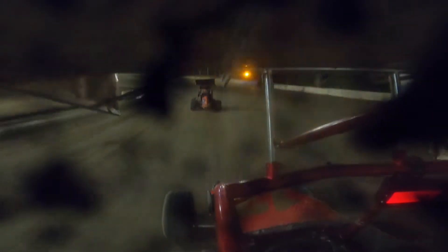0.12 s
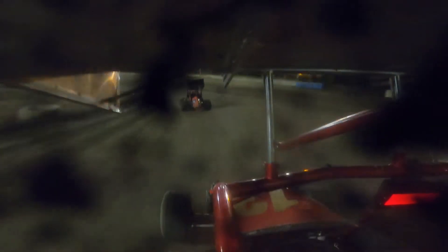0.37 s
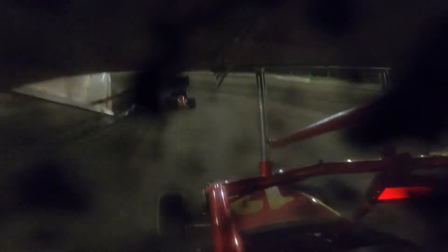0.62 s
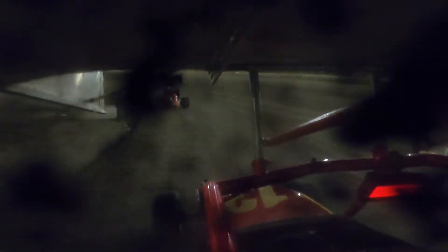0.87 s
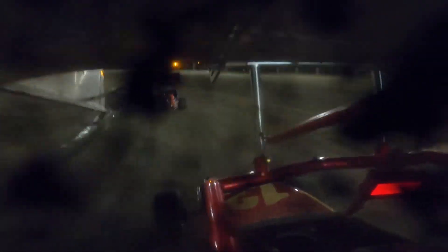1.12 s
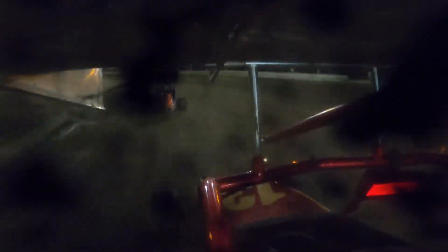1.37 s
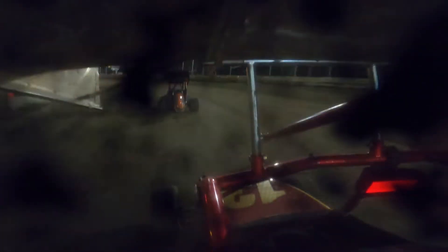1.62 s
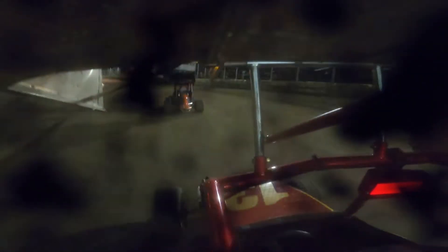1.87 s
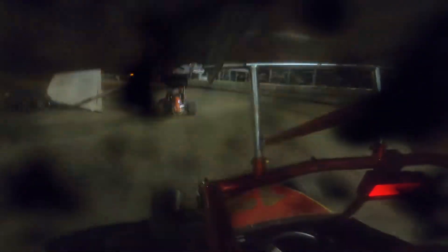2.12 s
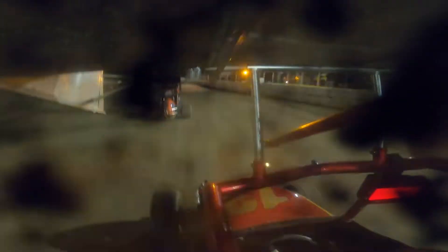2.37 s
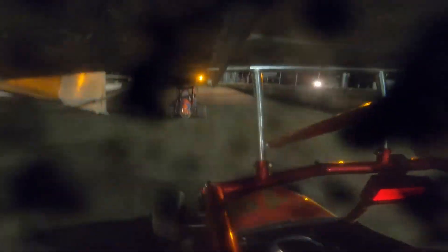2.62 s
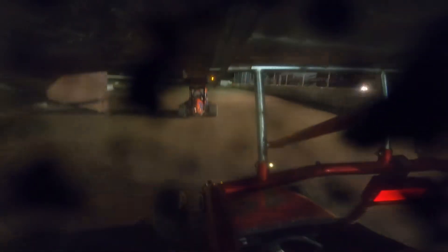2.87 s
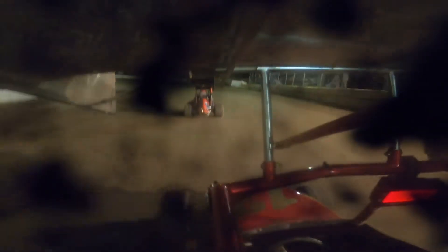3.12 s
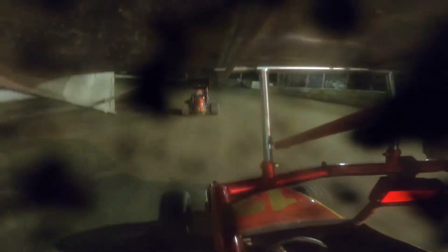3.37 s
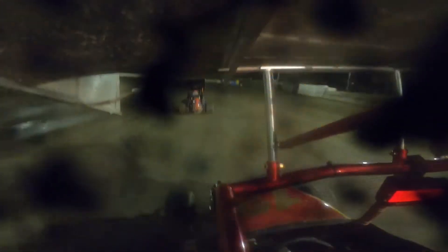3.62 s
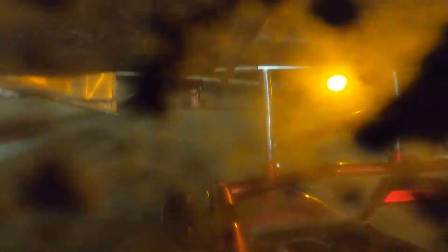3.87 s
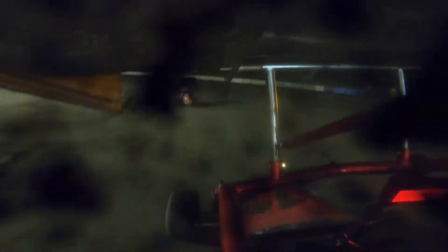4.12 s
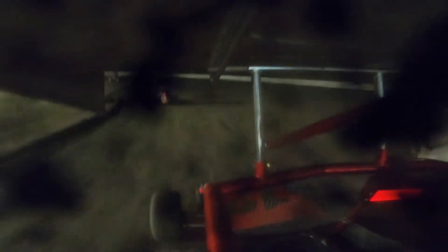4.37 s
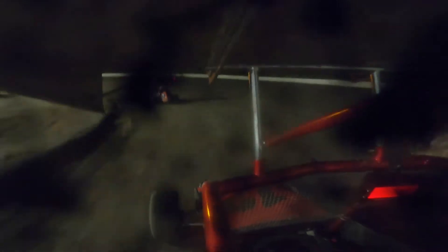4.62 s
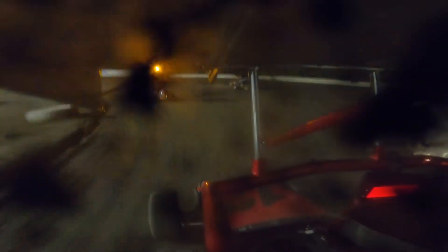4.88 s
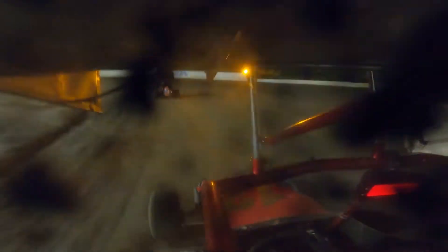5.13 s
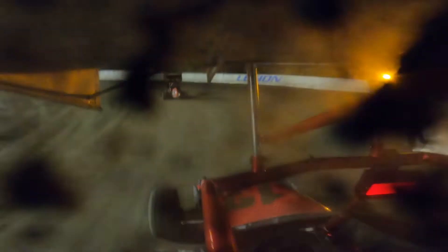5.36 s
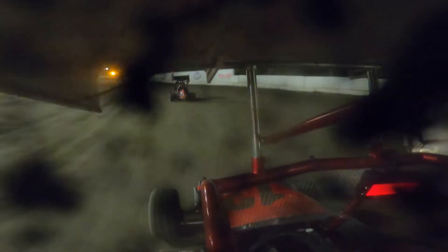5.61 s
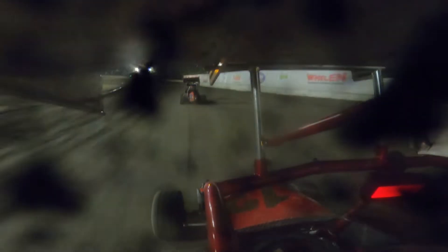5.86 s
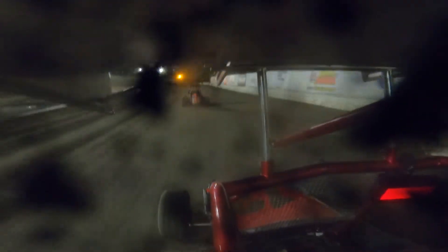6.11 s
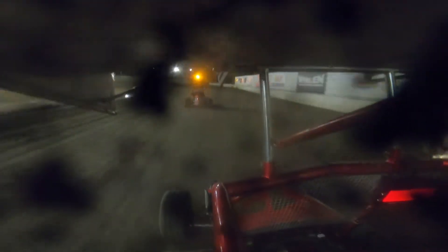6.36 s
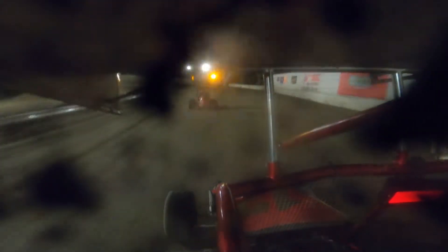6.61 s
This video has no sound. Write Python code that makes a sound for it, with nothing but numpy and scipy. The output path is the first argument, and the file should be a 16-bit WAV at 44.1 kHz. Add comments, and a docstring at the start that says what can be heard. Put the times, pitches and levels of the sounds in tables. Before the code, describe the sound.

A small racing engine drones loudly at high revs, muffled inside a sealed case, with frame buzz, track rumble and ticking grit.

```python
"""Racing engine from inside a sealed case

A small racing engine at high revs, heard by a microphone in a sealed camera case bolted to the roll cage.
The crank's shake comes through the frame as three low orders, whose beat stumbles now and then.
Frame buzz and track rumble are fluttering noise through resonances; flying grit is short noise scratches.
The case colours the grit and buzz, and shuts out the treble."""
import sys
import numpy as np
from scipy import signal
from scipy.fft import rfft, irfft, next_fast_len
from scipy.io import wavfile

SR = 44100
rng = np.random.default_rng(int(sys.argv[2]) if len(sys.argv) > 2 else 0)


def transcribe(u):
    """Save the signal u as a 16-bit wav file named by the first command-line argument.

    u: samples, shape (n,) or (channels, n), limited to [-1, 1]; the rate is SR.
    q: integer samples, one column per channel.
    """
    v = np.clip(np.atleast_2d(u).T, -1, 1)
    q = np.round(v * 32767).astype(np.int16)
    wavfile.write(sys.argv[1], SR, q)


def amp(db):
    return 10 ** (np.asarray(db, float) / 20)


N = 297218


def curves(rows):
    """Columns of a table whose first column is seconds, joined by straight lines in time."""
    s, *columns = np.transpose(rows)
    return [np.interp(np.arange(N) / SR, s, c) for c in columns]


def unit(x):
    """Scaled to rms 1."""
    return x / np.sqrt(np.mean(x ** 2) + 1e-20)


def drift(corner_hz):
    """Slow random wander of rms 1: white noise through two equal one-pole low-passes."""
    r = np.exp(-2 * np.pi * corner_hz / SR)
    noise = rng.standard_normal(N + SR)
    settled = signal.lfilter([1], [1, -2 * r, r * r], noise)[SR:]
    return unit(settled)


def shaking(flutter_db):
    """Broad vibration of rms 1: white noise whose strength flutters."""
    return unit(rng.standard_normal(N) * amp(flutter_db))


def resonate(x, modes, skirt=2.147):
    """A causal filter whose power is the sum of steep-sided resonances; unit power for white input."""
    size = next_fast_len(N + SR)
    hz = np.fft.rfftfreq(size, 1 / SR)
    power = 0
    for mid_hz, width_hz, db in modes:
        power = power + amp(2 * db) / (1 + (2 * (hz - mid_hz) / width_hz) ** 2) ** skirt
    cepstrum = irfft(np.log(power / power.mean()) / 2, size)
    cepstrum[1:size // 2] *= 2          # folding gives the shortest ring that starts with the blow
    cepstrum[size // 2 + 1:] = 0
    response = np.exp(rfft(cepstrum))
    return irfft(rfft(x, size) * response, size)[:N]


def split(x, hz, kind):
    """Low, middle or high part of a sound, by a Butterworth filter."""
    return signal.sosfilt(signal.butter(4, hz, kind, fs=SR, output="sos"), x)


# The ground under the wheels, which jolts the crank and shakes the frame.
# Each row: time in seconds, roughness from 0 to 1.
GROUND_ROUGHNESS = [(0, .4), (.45, .5), (.6, .9), (1.15, .9), (1.3, .35), (2.1, .15), (3.7, .15), (3.9, .4),
                    (5.45, .4), (5.55, 1), (5.68, 1), (5.75, .3), (6.25, .6), (6.45, .4), (6.74, .4)]


def roughness():
    """How rough the ground is at each moment."""
    return curves(GROUND_ROUGHNESS)[0]


# Moments when the beat stumbles and picks up out of step.
# Each row: middle in seconds, dip in dB of the first order, slip in crank turns.
BEAT_STUMBLES = [(.59, 12, .5), (.685, 7, -.4), (.755, 11, .4), (.932, 12, 0), (1.111, 13, 0),
                 (4.19, 11, -.15), (4.54, 5, .05), (5.336, 9, -.25), (5.537, 14, -.4), (5.565, 12, -.4),
                 (5.61, 8, -.4), (5.649, 11, 0), (5.932, 10, -.25), (6.163, 7, .3), (6.204, 7, -.4),
                 (6.381, 12, -.4), (6.628, 11, -.5), (6.687, 6, .3)]


def stumbles():
    """Bell-shaped dip in dB and smoothly stepped slip in radians of all stumbles."""
    half_width_s, stride = .009, 50   # stride: samples between computed points
    s, dip_db, turns = np.transpose(BEAT_STUMBLES)[:, :, None]
    away = (np.arange(0, N + stride, stride) / SR - s) / half_width_s
    dips = (dip_db * np.exp(-away ** 2)).sum(axis=0)
    slips = (np.pi * turns * (1 + np.tanh(2 * away))).sum(axis=0)
    return [np.interp(np.arange(N) / stride, np.arange(len(c)), c) for c in (dips, slips)]


# Speed of the engine, before wobble and slips.
# Each row: time in seconds, crank turns per second.
ENGINE_SPEED = [(0.0, 76.6), (0.8, 76.6), (0.98, 80), (1.2, 76), (1.4, 74.3), (1.75, 73.2), (2.15, 68.4),
                (2.3, 63.8), (2.45, 62.4), (2.9, 65.6), (3.05, 63.5), (3.3, 64.2), (3.5, 67.3),
                (3.75, 68.6), (3.97, 72), (4.38, 70.8), (4.55, 68.4), (4.95, 71), (5.3, 74.8), (5.57, 74.6),
                (5.72, 79.3), (6.12, 81.5), (6.35, 80.4), (6.74, 84.3)]


def crank_angle():
    """The crank turns unevenly, more so over rough ground, and slips at stumbles; angle in radians."""
    wobble = (.018 + .022 * roughness()) * drift(24)
    speed = curves(ENGINE_SPEED)[0] * (1 + wobble)
    slip = stumbles()[1]
    return 2 * np.pi * np.cumsum(speed) / SR + slip


# What the frame passes on from the crank orders to the case, by their pitch.
# Each row: pitch in Hz, rms level in dB before dips, wavering and gain control.
FRAME_MOUNT = [(62, -12), (72, -14), (84, -14.5), (124, -29), (132, -27.5), (148, -23), (168, -22.5),
               (188, -34), (208, -30), (224, -35.5), (250, -42)]


def engine(angle):
    """Three orders locked to the crank, as loud as the frame passes them, each wavering in its own way."""
    speed, rough = curves(ENGINE_SPEED)[0], roughness()
    first_db, second_db, third_db = (np.interp(k * speed, *np.transpose(FRAME_MOUNT)) for k in (1, 2, 3))
    dip_db = stumbles()[0]
    # rough ground dulls the first order and makes it waver
    first_db = first_db - dip_db - 1.0 * rough + .7 * rough * drift(30)
    second_db = second_db - .3 * dip_db + 2.0 * drift(14)
    third_db = third_db + 1.2 * drift(5)
    first = amp(first_db) * np.cos(angle)
    second = amp(second_db) * np.cos(2 * angle + 1.45 + .3 * drift(14))
    third = amp(third_db) * np.cos(3 * angle - 1.3 + 0.65 * drift(6.2))
    return np.sqrt(2) * (first + second + third)


# Lowest resonances of the frame.
# Each row: middle in Hz, width in Hz, relative level in dB.
RUMBLE_MODES = [(52.3, 43, 0), (95, 63, -3.5), (177.5, 77, -3)]


def rumble():
    """Track rumble: slowly fluttering noise through the lowest resonances, louder over rough ground."""
    level_db = -22.5 + 3 * roughness()
    flutter_db = 1.2 * drift(12) + 1.2 * drift(2.5)
    return resonate(shaking(flutter_db) * amp(level_db), RUMBLE_MODES)


# Panel resonances, above the rumble.
# Each row: middle in Hz, width in Hz, relative level in dB.
PANEL_MODES = [(310, 93, -1.5), (361.7, 154, 0.5), (482, 164, -7)]


def panel(jolts):
    """Panels hum: noise through their resonances, fluttering by itself and a little with the jolts."""
    level_db = -23.5 + 0.5 * roughness()
    flutter_db = 1.7 * drift(60) + 0.43 * jolts
    return resonate(shaking(flutter_db) * amp(level_db), PANEL_MODES)


# Resonances of the sealed case around the microphone, weak in the treble.
# Each row: middle in Hz, width in Hz, relative level in dB.
CASE_MODES = [(778, 250, -5.5), (1035, 238, -3), (1232.6, 268, 0.5), (1375, 39, -5.5), (1621, 160, -12.5),
              (1984, 465, -16.5), (2220, 100, -27.5), (2514, 180, -23.5), (2910, 366, -22),
              (3465, 810, -29), (4093, 365, -26.5), (5070, 300, -49.5), (5770, 780, -47.5),
              (7180, 650, -58.5), (9450, 1000, -70), (10300, 1100, -69), (12200, 2100, -71.5),
              (14000, 1500, -82)]
# Hollow drone of the case.
# Each row: time in seconds, level in dB before the low-pass split and gain control.
HOLLOW_LEVEL = [(0, -20), (.6, -20.5), (1.3, -21), (1.9, -23.5), (2.35, -26), (2.8, -19), (3.15, -25.5),
                (3.4, -22), (4.7, -20), (5.1, -22), (5.5, -20), (6.35, -21.5), (6.58, -16.5), (6.74, -24)]


def case(angle, jolts):
    """Drone, buzz and rattle of the case share its resonances and jolts; the rattle swells once a turn."""
    hollow_to_hz, rattle_from_hz = 880, 1547
    hollow_db = curves(HOLLOW_LEVEL)[0]
    buzz_db = -22.5
    rattle_db = -21.5 + 1 * roughness() - 1.4 * np.cos(angle - .1)
    hollow = resonate(shaking(0.83 * drift(46) + 1.6 * jolts) * amp(hollow_db), CASE_MODES)
    buzz = resonate(shaking(0.22 * drift(50) + 1.2 * jolts) * amp(buzz_db), CASE_MODES)
    rattle = resonate(shaking(0.97 * drift(60) + 1.6 * jolts) * amp(rattle_db), CASE_MODES)
    low = split(hollow, hollow_to_hz, "low")
    middle = split(buzz, [hollow_to_hz, rattle_from_hz], "band")
    high = split(rattle, rattle_from_hz, "high")
    return low + middle + high


def frame(angle):
    """Track and engine shake the frame; the same jolts reach the panels and all of the case at once."""
    jolts = drift(79)
    return rumble() + panel(jolts) + case(angle, jolts)


# Stones that strike the case, close to the microphone.
# Each row: start in seconds, relative level in dB, thud against that in dB, sharp edge against that in dB.
STONES = [(0.1426, -48, 6, -30), (0.5472, -41, 7, -23.5), (0.5686, -36, 0, -22), (0.607, -41.5, 8, -16),
          (0.6784, -35.5, 4, -29), (0.818, -35, 3, -22), (0.8585, -38.5, 7, -22.5), (1.0007, -39, 1, -26),
          (1.0306, -42.5, -1, -29.5), (1.1114, -40.5, 3, -22), (1.1947, -37, 5, -29.5),
          (1.205, -43.5, 15, -19.5), (1.218, -44.5, 13, -17), (1.2449, -36, 10, -22),
          (1.3243, -38.5, 13.5, -19), (1.36, -41, 10, -25), (1.4282, -45, 6, -25), (1.4427, -40, 1, -24.5),
          (1.51, -37.5, 6, -23), (1.5931, -43.5, 7, -22), (1.6207, -38, 5, -27), (1.6475, -35, 0, -28),
          (1.6916, -40.5, 7, -29), (1.8649, -39.5, 1, -25.5), (1.9106, -37.5, -4, -24.5),
          (1.9814, -37, -2, -30), (1.996, -38, 0, -23), (2.3087, -36.5, 7, -28.5),
          (2.3327, -46.5, 13, -15.5), (2.3705, -35, 6, -21.5), (2.5321, -31, 6, -25.5),
          (2.542, -44, 3, -17.5), (2.56, -34, -2, -22), (2.6184, -43, -3, -29.5), (2.632, -38, 4, -25),
          (2.6816, -41, 12, -24), (2.7584, -41, 3, -23), (2.7681, -37, 7, -23.5), (2.812, -39.5, 2, -22),
          (3.049, -38.5, 6, -23), (3.3098, -31, 3.5, -24.5), (3.455, -36, -1, -24), (3.485, -43, 8, -22),
          (3.5648, -29.5, -4, -26.5), (3.5804, -43, 7, -20.5), (3.6888, -33, 4, -25.5),
          (3.891, -39, -1.5, -31), (3.9443, -38.5, 8, -22.5), (3.9739, -41, -1, -24),
          (4.0266, -40.5, 9, -18), (4.1535, -40.5, 13, -25.5), (4.1722, -41, 2, -27.5),
          (4.1829, -43, 2, -28), (4.2612, -41.5, 2, -25), (4.357, -32.5, 5, -23), (4.3864, -39.5, 7, -24.5),
          (4.4443, -41.5, 5, -19.5), (4.4685, -37, 5, -29), (4.545, -40, 10, -25), (4.6095, -38, 7, -26),
          (4.65, -42.5, 2, -21), (4.7058, -36, 0.5, -29.5), (4.7197, -42, 14, -22),
          (4.7344, -33, 10.5, -23.5), (4.7585, -45.5, 9, -23), (4.8065, -44, 8, -20.5),
          (4.82, -38.5, 5, -23.5), (4.833, -46, 6, -27), (4.8894, -36, 6, -21.5), (4.9419, -33.5, 1, -24.5),
          (5.032, -43.5, 1, -26.5), (5.326, -45, 10, -15.5), (5.4715, -39, 7.5, -24),
          (5.9894, -41, 9, -24.5), (6.1309, -36, 7, -28), (6.5657, -39.5, -1, -32)]
# Small grit between the big stones.
# Each row: time in seconds, mean grains per second.
SMALL_GRIT = [(0, 24), (.5, 46), (5, 46), (5.3, 30), (6.74, 30)]


def grit():
    """Each stone is a short noise scratch with a faint tail, in three bands: thud, tick and sharp edge."""
    s, stone_db, thud_db, sharp_db = np.transpose(STONES)
    at = np.round(s * SR).astype(int)
    thud, tick, edge = np.zeros((3, N))
    # the added dB make up for what the case holds back in each band
    thud[at] = amp(stone_db + thud_db + 20)
    tick[at] = amp(stone_db + 39)
    edge[at] = amp(stone_db + sharp_db + 62.5)

    born = rng.random(N) < curves(SMALL_GRIT)[0] / SR
    small = born * amp(-16.5 + 5.2 * np.minimum(rng.exponential(1, N), 3))

    t = np.arange(SR // 25) / SR
    rise = 1 - np.exp(-t / 0.00037)
    scratch = rise * (np.exp(-t / 0.0016) + .12 * np.exp(-t / 0.0081))
    noise = rng.standard_normal(N)
    bands = [(thud + 0.2 * small, [1700, 4600]),
             (tick + small, [4600, 8300]),
             (edge + 0.5 * small, [8300, 17000])]
    blows = np.zeros(N)
    for hits, hz in bands:
        strength = signal.fftconvolve(hits, scratch)[:N]
        blows += split(strength * noise, hz, "band")
    return resonate(blows, CASE_MODES)


def scene():
    """Engine, frame and grit all meet at the one microphone in the case."""
    angle = crank_angle()
    return (engine(angle) + frame(angle) + grit())[None]


def low_pass(x):
    """Removes everything above the highest recorded frequency."""
    return signal.sosfilt(signal.butter(12, 15800, fs=SR, output="sos"), x)


def record(dry):
    """A quick gain control evens the level, peaks are rounded, a small offset remains."""
    follow_s = 0.071
    r = np.exp(-1 / (follow_s * SR))
    power = signal.lfilter([1 - r], [1, -r], dry[0] ** 2, zi=[amp(-19.0)])[0]
    even = dry * (power / amp(-23.5)) ** -.22   # amp(-23.5) is the mean square left unchanged
    rounded = 1.367 * np.tanh(even / 1.268)
    return low_pass(rounded - .002)


dry = scene()
out = record(dry)
transcribe(out)
```